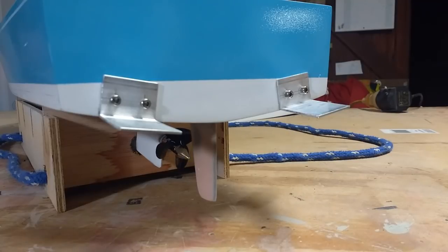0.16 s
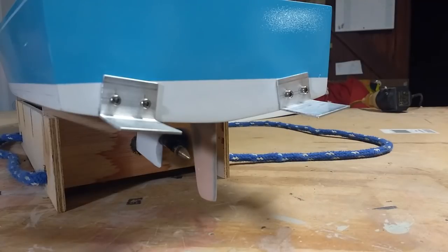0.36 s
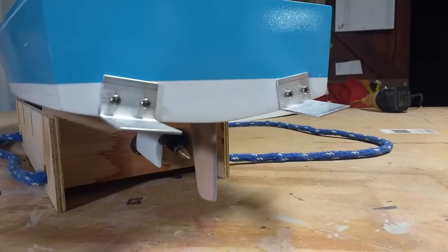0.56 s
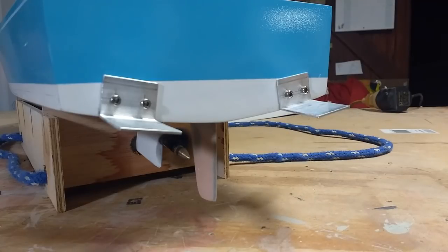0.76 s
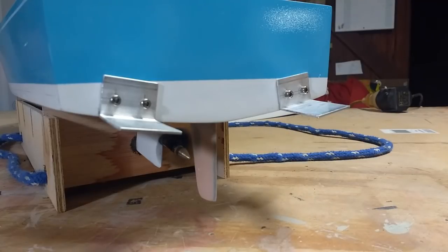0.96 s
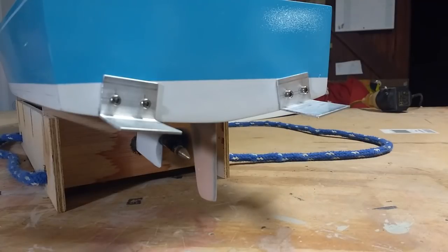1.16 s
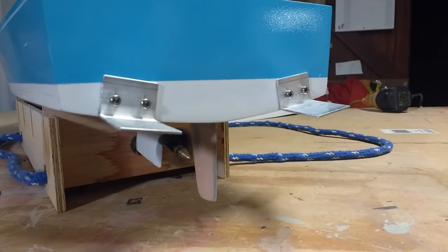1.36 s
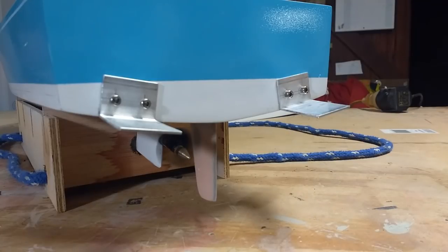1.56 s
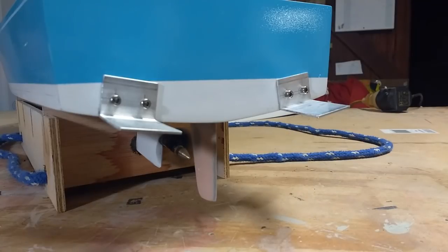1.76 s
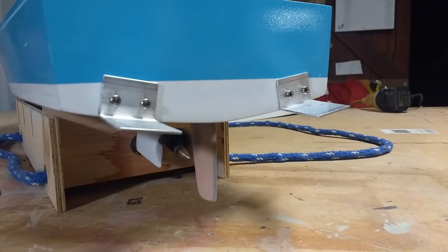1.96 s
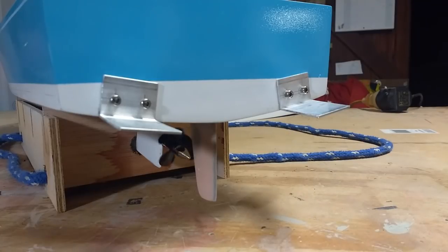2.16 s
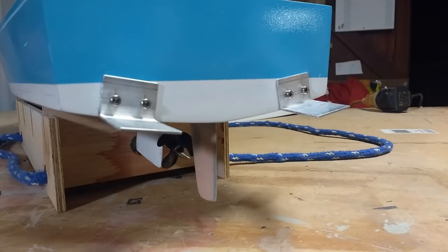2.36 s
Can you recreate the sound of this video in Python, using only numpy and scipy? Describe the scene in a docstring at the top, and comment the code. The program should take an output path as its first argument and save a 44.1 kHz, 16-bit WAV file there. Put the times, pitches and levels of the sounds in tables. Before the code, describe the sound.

Close stereo pickup in a hushed workshop: thin electronic whine and soft cricket chirps, then a model boat's motor and shaft burst into a bright, grating whir ringing through the hull, slowing quickly to quiet.

```python
"""First a thin, high whine from a speed controller, and a faint cricket chirp in a quiet workshop.
Then a small motor spins a model boat's propeller shaft dry on a workbench for two seconds.
The shaft chatters in its tube: random touches and friction noise ring the hull's resonances.
The treble rises and falls with speed; wavering sines give the hull's drone and the shaft's turning.
The workshop is shaped noise with a faint hum of sines; the chirps are narrow bands of noise."""
import sys
import numpy as np
from scipy import signal
from scipy.fft import rfft, irfft
from scipy.io import wavfile

SR = 44100
rng = np.random.default_rng(int(sys.argv[2]) if len(sys.argv) > 2 else 0)


def file_out(sig):
    """Save sig as 16-bit WAV at sys.argv[1]."""
    # one column per channel
    cols = np.atleast_2d(sig).T
    # limit, then scale
    lim = np.clip(cols, -1, 1)
    pcm = np.round(lim * 32767).astype(np.int16)
    wavfile.write(sys.argv[1], SR, pcm)


def invert_db(x):
    """Field ratio 10**(x/20) for x, a level in decibels (scalar or array-like)."""
    u = np.asarray(x, float) / 20
    return 10 ** u


N = 105840   # samples, 2.4 seconds


def at_hz(points, hz):
    """Reads a curve of (Hz, value) points, in straight lines over the log of frequency."""
    known_hz, values = np.transpose(points)
    return np.interp(np.log(hz + 1), np.log(known_hz + 1), values)


def in_time(rows):
    """Turns rows that begin with seconds into one smooth curve over the scene per later column."""
    s, *columns = np.transpose(rows)
    return [np.interp(np.arange(N) / SR, s, column) for column in columns]


def rms_one(x):
    """Scales a sound to an rms level of 1."""
    return x / np.sqrt(np.mean(x ** 2) + 1e-20)


def drift(corner_hz):
    """Slow random wandering of rms 1: noise through two equal one-pole low-passes."""
    hop, settle = 20, 2000   # one point every 20 samples; the first points are thrown away
    pole = np.exp(-2 * np.pi * corner_hz * hop / SR)
    noise = rng.standard_normal(N // hop + settle + 2)
    slow = rms_one(signal.lfilter([1], [1, -2 * pole, pole * pole], noise)[settle:])
    return np.interp(np.arange(N) / hop, np.arange(len(slow)), slow)


def peak(x, hz, width_hz, db):
    """A resonance: lifts the sound by db at hz and leaves it alone far away."""
    w, g = 2 * np.pi * hz / SR, invert_db(db / 2)
    a = np.sin(w) * width_hz / hz / 2
    return signal.lfilter([1 + a * g, -2 * np.cos(w), 1 - a * g],
                          [1 + a / g, -2 * np.cos(w), 1 - a / g], x)


# How alike left and right are. Each point: frequency in Hz, shared part of the power from 0 to 1.
SIDE_LIKENESS = [(60, 0.5), (150, 0.02), (300, 0.43), (600, 0.57), (1200, 1), (1800, 0.44), (2250, .93),
                 (2600, .95), (3000, .5), (3700, .88), (4250, .35), (4750, .92), (5050, .95), (5450, .35),
                 (6200, 0.33), (7500, .75), (8100, 0.26), (9400, 0.55), (10500, 0.74), (13000, 0)]
# How far the left port hears first. Each point: frequency in Hz, lead in half turns of phase.
LEFT_LEAD = [(0, 0), (700, 0), (1400, 0.1), (2200, .94), (2650, 1.06), (3200, 1.9), (3900, 2.1),
             (4700, 2.96), (5150, 3.04), (6000, 3.9), (6800, 4.1), (7400, 5.0), (8400, 6.0), (9550, 7.0),
             (12100, 9.0), (16000, 12.0)]


def two_sides(shared, left, right, hz):
    """Left and right: a shared spectrum arrives with a lead on the left, the rest is each side's own."""
    alike = np.clip(at_hz(SIDE_LIKENESS, hz), 0, 1)
    lead = np.exp(.5j * np.pi * np.interp(hz, *np.transpose(LEFT_LEAD)))
    return np.array([np.sqrt(alike) * shared * lead + np.sqrt(1 - alike) * left,
                     np.sqrt(alike) * shared / lead + np.sqrt(1 - alike) * right])


def contacts():
    """Random touches of shaft on tube over a bed of friction; one shared stream, one for each side."""
    touches_per_s, spread_db, friction_db = 5000, 3.0, 0   # friction against the touches
    # most touches are small, a few up to five spreads stronger, pushing either way
    sizes = invert_db(spread_db * np.minimum(rng.exponential(1, (3, N)), 5))
    sizes = sizes * rng.choice([-1, 1], (3, N))
    touches = sizes * (rng.random((3, N)) < touches_per_s / SR)
    return rms_one(touches) + invert_db(friction_db) * rng.standard_normal((3, N))


# The shaft's drive, in three parts that follow each other.
# Each row: time in seconds, chatter in the hull in dB, treble against it in dB (it stands for speed).
SHAFT_DRIVE = [
    [(0.0, -61, -19), (0.022, -54.5, -24), (0.122, -78, -5), (0.14, -50, -32), (0.2, -43.5, -38),
     (0.214, -28.5, -37), (0.24, -27, -20), (0.308, -17, -24), (0.316, -19.5, -18.5), (0.532, -26, -7.5),
     (0.588, -24.5, -9.5), (0.6, -30.5, -7)],
    [(0.62, -27.5, -8), (0.664, -27, -7), (0.684, -25.5, -10), (0.79, -29, -6), (0.798, -26.5, -9.5),
     (0.906, -29, -5), (0.926, -25.5, -9.5), (1.096, -28.5, -7.5), (1.138, -23.5, -11), (1.184, -27.5, -7),
     (1.812, -27.5, -10), (1.98, -28.5, -14.5)],
    [(2.0, -29.5, -10.5), (2.024, -26.5, -20), (2.062, -33, -15), (2.068, -24.5, -22.5),
     (2.108, -29, -23.5), (2.114, -35.5, -15), (2.148, -34, -27.5), (2.174, -49.5, -24), (2.188, -48, -31),
     (2.248, -66, 4), (2.26, -63, -14)],
]


def drive_chatter(touches, hz):
    """Chatter swells with drive and surges, octave by octave; higher octaves follow speed more."""
    speed_from_hz, speed_to_hz = 1300, 5100   # the follow share grows from 0 to 1 between these
    speed_bend, bass_speed_share = 0.76, 0.17   # curve of that growth; share of the lowest band
    surge_db, judder_db, surge_corner_hz = 0.56, 1.5, 51.5
    band_surge_db, treble_surge_share = 0.58, 0.46
    stop_s, stop_fade_s = 2.205, 0.031

    t = np.arange(N) / SR
    drive_db, speed_db = in_time(np.vstack(SHAFT_DRIVE))
    speed_db = speed_db - np.median(speed_db)
    # rougher surges while spinning up
    depth = surge_db + judder_db * np.interp(t, [0.4, 0.52], [1, 0])
    surge = depth * drift(surge_corner_hz)
    octave = np.log2(np.clip(hz, 180, 11520) / 180)
    driven = 0
    for k in range(7):
        place = np.log(180 * 2 ** k / speed_from_hz) / np.log(speed_to_hz / speed_from_hz)
        place = np.clip(place, 0, 1.5)
        share = place ** speed_bend if k else bass_speed_share
        # neighbouring bands cross-fade
        band = irfft(touches * np.clip(1 - abs(octave - k), 0, 1), N)
        level_db = drive_db + share * speed_db + surge * treble_surge_share ** share
        driven = driven + band * invert_db(level_db + band_surge_db * drift(15))
    return driven * np.interp(t, [stop_s, stop_s + stop_fade_s], [1, 0])


# Broad colour of the chatter. Each point: frequency in Hz, relative level in dB per Hz.
CHATTER_COLOUR = [(35, -33), (75, -23), (110, -20), (215, -19.5), (295, -16), (325, -11), (500, -3.5),
                  (1000, -3.5), (1500, -4.5), (2500, 0), (3600, -9.5), (4500, -6), (6500, -9.5), (9000, -8),
                  (11000, -17), (12300, -19.5), (13100, -23.5), (14400, -36), (15400, -60)]
# Resonances of hull and fittings. Each row: frequency in Hz, width in Hz, lift in dB.
HULL_RESONANCES = [(151.6, 17, 11.5), (346.4, 31, 12), (504, 24, 9), (546, 45, 3.5), (561.6, 37.7, 10.5),
                   (618.3, 38, 8.5), (729, 31.4, 12.5), (830, 18, 1), (970, 10.7, 8.5), (1131, 47, 6),
                   (1206.2, 35.6, 12), (1245.6, 34, 9), (1361, 44, 2), (1348, 40, 7.5), (1594, 34, 2.5),
                   (1900, 37, 7.5), (1997, 28, 6.5), (2014, 22, 7), (2225, 50, 4), (2455, 60, 4),
                   (7300, 400, 6), (8270, 220, 5), (12250, 450, 4), (2550, 160, 3), (3132, 46, 9),
                   (3466, 170, 10.5), (3690, 61, 9), (3794, 19, 10.5), (4404, 230, 2.5), (5950, 150, 5.5),
                   (9360, 290, 6), (11240, 320, 8)]
# Left side minus right. Each point: frequency in Hz, difference in dB.
LEFT_LEAN = [(60, 0), (140, -4), (250, 3.5), (550, 6), (800, 4), (1160, -.5), (1500, -4), (1950, -1.5),
             (2250, 0), (5100, 0), (5900, -5), (7300, -3), (8500, 1), (9500, -6), (11500, -10),
             (12450, -10), (13000, -18), (15000, -18)]


def shaft():
    """The driven chatter rings the hull, whose resonances colour it, and reaches both ports."""
    hz = np.fft.rfftfreq(N, 1 / SR)
    touches = rfft(contacts())
    driven = drive_chatter(touches, hz)
    hull = signal.unit_impulse(N)
    for row in HULL_RESONANCES:
        hull = peak(hull, *row)
    hull = rfft(hull) * invert_db(at_hz(CHATTER_COLOUR, hz))
    left_gain = invert_db(at_hz(LEFT_LEAN, hz) / 2)
    lean = [left_gain, 1 / left_gain]
    # undriven chatter between 400 and 1500 Hz, both sides averaged, sets the reference level
    steady = two_sides(*touches * hull, hz) * lean
    middle = steady.mean(0) * (hz > 400) * (hz < 1500)
    reference = np.sqrt(np.mean(irfft(middle, N) ** 2))
    return irfft(two_sides(*rfft(driven) * hull, hz) * lean, N) / reference


def low_tone(rows, lean_db, lead):
    """A wavering sine that follows its table; left gets lean_db and lead (radians), right the opposite."""
    waver_db, fade_s = 3, 0.017
    t, (hz, db) = np.arange(N) / SR, in_time(rows)
    start, end = rows[0][0], rows[-1][0]
    gate = np.interp(t, [start - fade_s, start, end, end + fade_s], [0, 1, 1, 0])
    sides = np.array([[1], [-1]])
    wave = np.sin(2 * np.pi * np.cumsum(hz) / SR + lead * sides)
    return np.sqrt(2) * gate * invert_db(db + waver_db * drift(4.3) + lean_db * sides) * wave


# The hull's drone. Each row: time in seconds, pitch in Hz, rms level in dB before waver and lean.
HULL_DRONE = [(0.3, 140.0, -68), (0.384, 145.8, -44), (0.612, 147.8, -59.5), (0.76, 141.5, -66),
              (0.86, 150.4, -56), (1.262, 145.6, -49), (1.696, 151.7, -79), (2.034, 144.5, -57.5),
              (2.2, 150.4, -54)]


def hull_drone():
    """The hull drones under the running motor as one low sine, stronger on the right."""
    return low_tone(HULL_DRONE, lean_db=-2.5, lead=1.0)


# The shaft's turning. Each row: time in seconds, turning rate in Hz, rms level in dB before waver and lean.
SHAFT_TURNING = [(0.55, 61.7, -72), (0.64, 61.2, -73), (0.654, 61.4, -66), (1.152, 61.9, -57),
                 (1.628, 57.2, -71), (1.8, 62.6, -77)]


def shaft_turning():
    """The turning shaft gives a still lower sine at its turning rate."""
    return low_tone(SHAFT_TURNING, lean_db=-1.0, lead=0.82)


# The controller's whine. Each row: time in seconds, rms level in dB before waver and side balance.
WHINE_LEVEL = [(0.0, -51.5), (0.162, -48), (0.222, -41), (0.24, -51)]


def whine():
    """The speed controller's switching tone, a wavering sine until the motor catches."""
    whine_hz, waver_db, end_s, fade_s = 8018, 1.3, 0.24, 0.013
    t = np.arange(N) / SR
    fade = np.clip((end_s - t) / fade_s, 0, 1)
    level = invert_db(in_time(WHINE_LEVEL)[0] + waver_db * drift(10)) * fade
    right_ahead = np.array([[0], [.5]])   # radians
    balance = invert_db(np.array([[1.5], [-1.5]]))   # left a little louder
    return np.sqrt(2) * level * np.sin(2 * np.pi * whine_hz * t + right_ahead) * balance


# The cricket's chirps. Each row: start in seconds, length in seconds, level at its height in dB.
CRICKET_CHIRPS = [(0.019, 0.075, -49.5), (0.153, 0.096, -51.5), (2.12, .07, -58), (2.296, 0.082, -56)]


def cricket():
    """Soft chirps: narrow noise swelling and fading, blurred between the sides as by a room."""
    centre_hz, width_hz = 5360, 360
    t, shape = np.arange(N) / SR, 0
    for s, length, db in CRICKET_CHIRPS:
        shape = shape + invert_db(db) * np.sin(np.pi * np.clip((t - s) / length, 0, 1))
    edges = [centre_hz - width_hz / 2, centre_hz + width_hz / 2]
    narrow = signal.butter(2, edges, "band", fs=SR, output="sos")
    mid, side = signal.sosfilt(narrow, rng.standard_normal((2, N)))
    return shape * rms_one(mid + 0.49 * side * np.array([[1], [-1]]))


# Colour of the workshop's hush. Each point: frequency in Hz, relative level in dB per Hz.
HUSH_COLOUR = [(24, -45), (40, -21), (150, -6), (300, -22), (850, -14), (1300, -23), (2000, -23),
               (2800, -26), (3600, -17), (4500, -19), (5500, -17), (7200, -31), (9500, -28), (12000, -32),
               (15300, -32)]
# Level of the hush, lower after the loud run. Each row: time in seconds, rms level in dB.
HUSH_LEVEL = [(0, -49), (.05, -51.5), (.2, -50), (.4, -52), (2.25, -56), (2.4, -55)]
# Faint appliance hum. Each row: frequency in Hz, rms level in dB.
APPLIANCE_HUM = [(118.4, -69.5), (150.7, -70), (242.2, -68), (360.7, -80.5)]


def workshop():
    """Broad hush of coloured noise, with a faint hum of steady sines."""
    t, hz = np.arange(N) / SR, np.fft.rfftfreq(N, 1 / SR)
    noise = rfft(rng.standard_normal((3, N))) * invert_db(at_hz(HUSH_COLOUR, hz))
    hush = rms_one(irfft(two_sides(*noise, hz), N))
    hum = sum(np.sqrt(2) * invert_db(db) * np.sin(2 * np.pi * f * t) for f, db in APPLIANCE_HUM)
    return invert_db(in_time(HUSH_LEVEL)[0]) * hush + hum


def scene():
    """All sources added together, left and right."""
    tones = hull_drone() + shaft_turning()
    return shaft() + tones + whine() + cricket() + workshop()


def low_pass(x):
    """Removes everything above the highest recorded frequency."""
    return signal.sosfilt(signal.butter(12, 15380, fs=SR, output="sos"), x)


def record(dry):
    """Turns the finished mix into the sound that is saved."""
    return low_pass(dry)


dry = scene()
out = record(dry)
file_out(out)
```